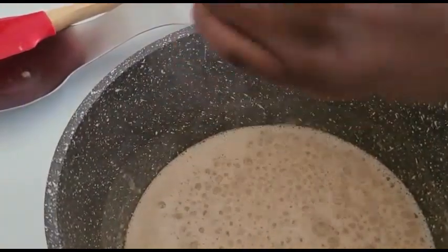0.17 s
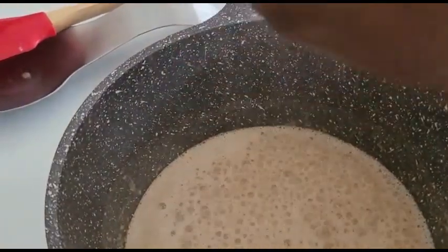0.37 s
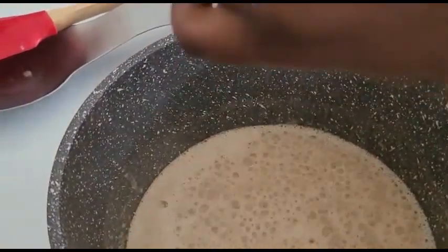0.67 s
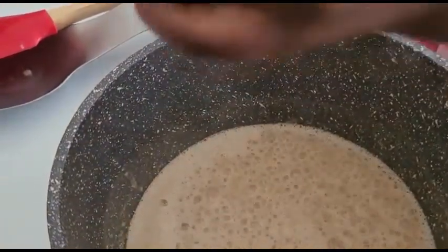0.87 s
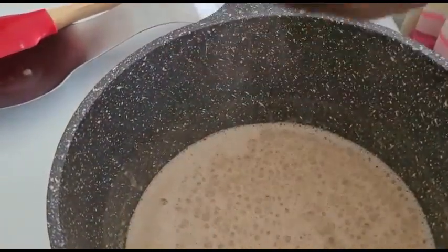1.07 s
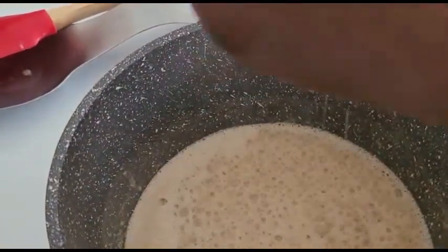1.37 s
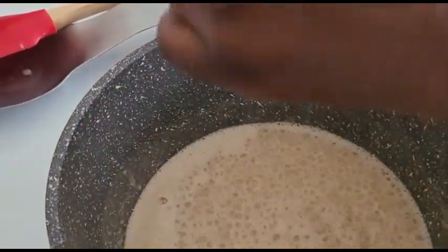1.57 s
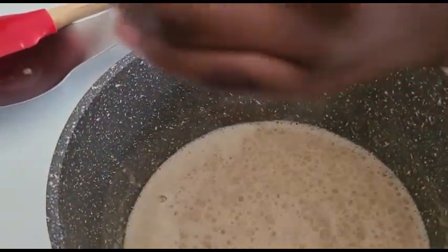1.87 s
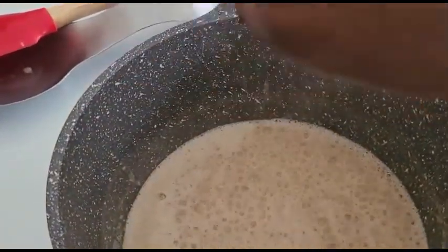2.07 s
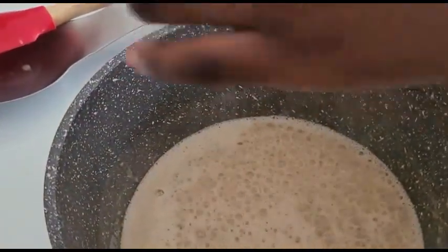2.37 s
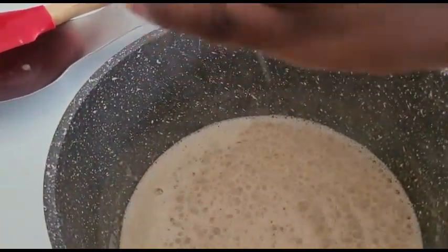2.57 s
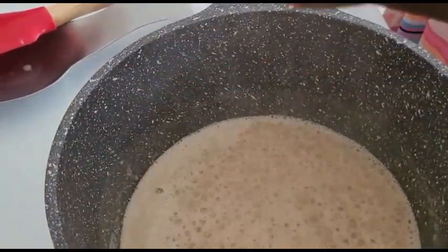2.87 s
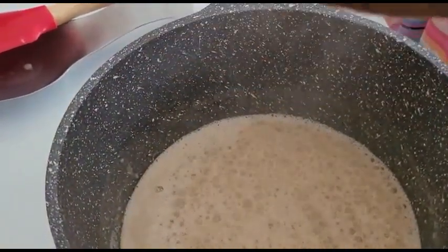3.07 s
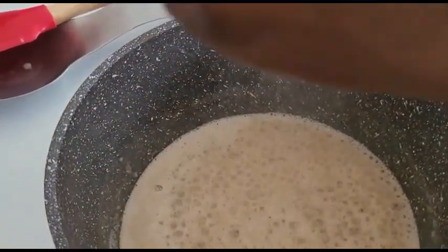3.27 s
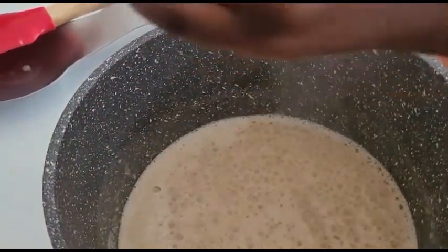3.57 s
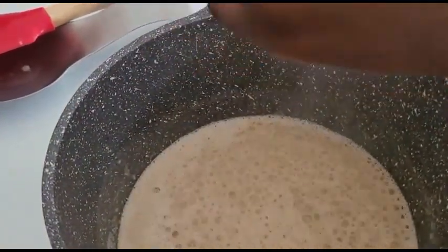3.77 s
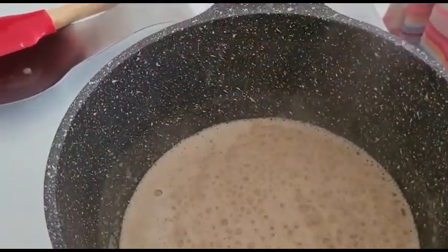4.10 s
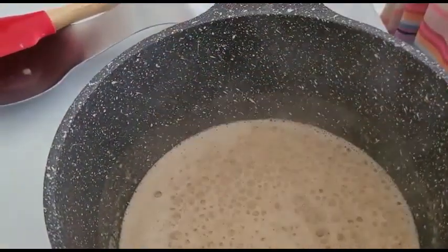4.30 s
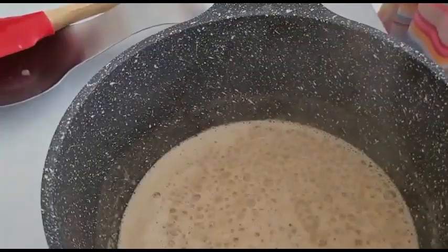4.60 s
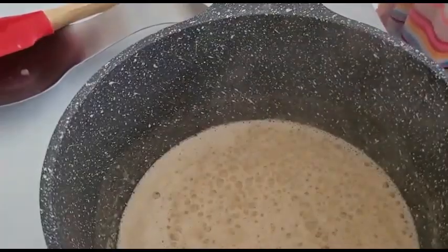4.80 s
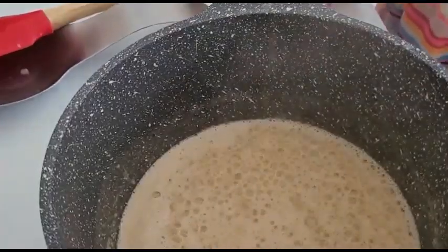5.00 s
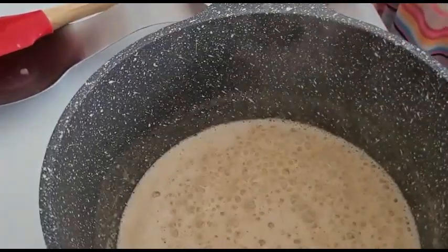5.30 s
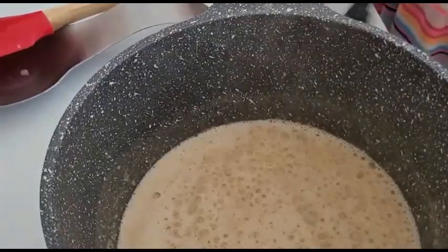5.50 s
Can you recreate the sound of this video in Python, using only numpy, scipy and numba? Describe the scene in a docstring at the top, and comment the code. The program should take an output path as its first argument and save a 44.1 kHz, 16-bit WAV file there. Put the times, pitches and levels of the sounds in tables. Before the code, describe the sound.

Dry hands clap and rub powder off each other close up, over a faint simmering fizz, ending in a hard knock on a worktop.

```python
"""Hands slap and rub powder off each other, close to a phone, over a simmering pan; late knocks follow.
Pats are noise bursts through the resonance of the cupped palms; rubs are gritty noise swelling by stroke.
Something set down and knocked rings the worktop's modes, and a grain pings the pan wall once.
Beneath, the fine fizz of the sauce flickers in octave bands over a gas burner roaring in its tube modes.
A short echo of the small kitchen follows the near sounds."""
import sys
import numpy as np
from scipy import signal
from scipy.fft import rfft, irfft
from scipy.io import wavfile
from scipy.ndimage import uniform_filter1d
from numba import njit

SR = 44100
rng = np.random.default_rng(int(sys.argv[2]) if len(sys.argv) > 2 else 0)


def generate_wav(sig):
    """Save sig (samples, or channels by samples) to the path in sys.argv[1] as 16-bit PCM at SR."""
    pcm = np.round(np.clip(np.atleast_2d(sig).T, -1, 1) * 32767).astype(np.int16)
    wavfile.write(sys.argv[1], SR, pcm)


N = 248935
TIME = np.arange(N) / SR
HZ = np.maximum(np.fft.rfftfreq(N, 1 / SR), 1)

# colour of the air cupped between the palms: (frequency [Hz], relative density [dB per Hz])
CUP_COLOUR = [(410, -70), (700, -26.5), (926, -17.5), (1850, -1.5), (2020, -0.5), (2620, -10), (2910, -3.5),
              (3240, -4.5), (7000, -5.5), (9100, -33), (15400, -120)]
# colour of dry skin hiss: (frequency [Hz], relative density [dB per Hz])
SKIN_COLOUR = [(2940, -42.5), (5000, -12.5), (7270, -9), (8970, -2.5), (9880, -4.5), (12400, -3),
               (13800, -5.5), (16000, -14.5)]
# stereo image of the hands: (frequency [Hz], left-right likeness [correlation])
HANDS_ALIKE = [(300, 1), (2000, 0.49), (6000, 0.032), (14000, 0.13)]


def undb(db):
    """Gain of a dB value."""
    return 10 ** (np.asarray(db) / 20)


def level(x, db):
    """Set the rms in dB, over both channels together."""
    return x * undb(db) / np.sqrt(np.mean(x ** 2))


def over_hz(table):
    """A (Hz, value) table read at every frequency, on a log frequency axis."""
    f, v = np.transpose(table)
    return np.interp(np.log(HZ), np.log(f), v)


def shape(x, gain):
    """Filter by a gain for each frequency."""
    return irfft(rfft(x, axis=-1) * gain, N, axis=-1)


def bump(hz, width_hz, grid=HZ):
    """Causal resonance read on a frequency grid, gain 1 at the centre."""
    damping = 1j * grid * width_hz
    return damping / (hz ** 2 - grid ** 2 + damping)


def pair(alike):
    """Stereo white noise as alike left and right as the table says."""
    c = np.clip(over_hz(alike), -.99, .99)
    mid_side = rfft(rng.standard_normal((2, N)), axis=-1)
    mid, side = mid_side * np.sqrt([(1 + c) / 2, (1 - c) / 2])
    return irfft(np.array([mid + side, mid - side]), N, axis=-1)


def walk(rate):
    """Random levels held 1 / rate s and slewed twice; spread near 1."""
    k = int(SR / rate)
    steps = np.repeat(rng.standard_normal(N // k + 1), k)
    return 1.3 * uniform_filter1d(uniform_filter1d(steps, k), k)[:N]


def burst(s, t60, rise_s=0.0003):
    """Quick rise at s, then an exponential fall."""
    t = np.maximum(TIME - s, 0)
    return (1 - np.exp(-t / rise_s)) * np.exp(-np.log(1000) * t / t60)


def pats():
    """Each pat: a crack that rings the air cupped between the palms, a bright snap, a grainy tail, a soft thump."""
    # pats of the palms: (time [s], strength [dB], cup resonance [Hz], treble before a common lift [dB],
    # left minus right [dB], tail against crack [dB])
    palm_pats = [(0.2214, -34, 3750, -8, -0.5, -13), (0.355, -31, 2950, -19, -3, -16),
                 (0.3767, -4.5, 2630, -15, 0.5, 1.5), (0.3856, 0, 3300, -13.5, -1, -10),
                 (0.4898, -27.5, 2090, -4.5, 2, -10.5), (0.6493, -34, 2000, -1, -2.5, -28),
                 (0.6987, -27, 3250, -21, -3, -11), (0.865, -23, 3300, -17, 1, -8.5),
                 (0.8731, -20.5, 4120, -17.5, -3, -3), (0.9504, -33, 1920, -7, 0.3, -10),
                 (0.985, -35, 2090, -5, 0.5, -11), (1.0184, -38, 2120, -5, 5, -18),
                 (1.0255, -38, 2150, 3, 3, -18), (1.039, -37, 2060, 3, 7, -17),
                 (1.2374, -28, 3310, -20.5, -7, -13), (1.268, -9, 3060, -29, 0, -11),
                 (1.2872, -4.5, 4030, -12.5, -1, -10.5), (1.3744, -16.5, 2860, -12.5, -3, -11.5),
                 (1.3814, -21, 2950, -18, 2, -15), (1.6273, -25, 1720, -16.5, -4, -11),
                 (1.6327, -31.5, 1600, -15, -4, -5), (1.699, -21.5, 3280, -20, -1, -10),
                 (1.733, -28, 3940, -12, -1, -15), (1.74, -18.5, 3980, -23, -4, -13.5),
                 (2.033, -25.5, 6100, -13, -7, -13), (2.085, -13, 3400, -26, -6, -18),
                 (2.095, -7, 3240, -18.5, 1.5, -8.5), (2.639, -30.5, 2140, 2, -1, -8.5),
                 (2.7608, -25, 3500, -24, -2, -7), (2.7935, -22, 2900, -35, -1, -7),
                 (3.1612, -23.5, 3300, -3, 0, -5.5), (3.1744, -10, 3020, -22, -4, -3.5),
                 (3.2, -11.5, 2980, -25, -2, -7), (3.2187, -15.5, 2900, -31, -1, -5.5),
                 (3.2607, -13.5, 3070, -13, -2, -14), (3.4936, -21.5, 2980, -22, -2, -3),
                 (3.5059, -24, 3110, -18, 2, -7), (3.5178, -25, 3360, -19, 8, -3),
                 (3.5251, -7, 3200, -17, -1, -6), (3.8125, -13, 3020, -23, 0, -9),
                 (3.8391, -6.5, 2920, -19.5, 0, -13.5), (4.577, -27, 1910, 5.5, -1, -4),
                 (4.5956, -30, 2280, -7, 6, -18), (4.778, -16.5, 2970, -15, -2, -5.5),
                 (4.7896, -23, 2930, -19, -8, -13), (4.8314, -25, 3120, -23, -4, -16),
                 (4.953, -21.5, 2350, -6, -4, -3)]
    tail_t60_s = 0.067
    thump_db, thump_per_db = -41, 0.8  # thump of a 0 dB pat, and how it follows the pat's strength
    out, span = np.zeros((2, N)), 16384  # span of one pat [samples]
    hz = np.maximum(np.fft.rfftfreq(span, 1 / SR), 1)
    broad = level(shape(pair(HANDS_ALIKE), undb(over_hz(CUP_COLOUR))), 0)
    snap = level(shape(pair(HANDS_ALIKE), undb(over_hz(SKIN_COLOUR))), 0)
    flesh = level(shape(pair(HANDS_ALIKE), bump(450.0, 520.0)), 0)
    air = pair(HANDS_ALIKE)
    grains = undb(3.5 * walk(300))
    bright = bump(9500, 9000, hz)
    for s, db, cup_hz, treble_db, pan_db, tail_db in palm_pats:
        i = slice(int(s * SR), int(s * SR) + span)
        crack = burst(s, 0.012, rise_s=0.00028)
        tail = undb(tail_db) * grains * burst(s, tail_t60_s, rise_s=0.0038)
        hit = (crack + tail)[i]
        hollow = bump(cup_hz, 1300, hz) ** 2
        cup = irfft(rfft(air[:, i] * hit, axis=-1) * hollow, span, axis=-1)
        top = irfft(rfft(snap[:, i] * hit, axis=-1) * bright, span, axis=-1)
        sound = cup + undb(-13.0) * broad[:, i] * hit + undb(treble_db + 4.0) * top
        out[:, i] += sound * undb(db + np.array([[pan_db], [-pan_db]]) / 2)
        thump = flesh[:, i] * burst(s, 0.049, rise_s=0.00027)[i]
        out[:, i] += undb(thump_db + thump_per_db * db) * thump
    return out


def rub():
    """Stick-slip of skin over powder: gritty noise, hollow between the palms and hissy on top."""
    # strokes of one palm over the other: (time at full pressure [s], hold [s], 20 dB rise [s], 20 dB fall [s],
    # cupped mid sound before a common trim [dB], dry skin hiss [dB], cup resonance [Hz]);
    # rises and falls under 5 ms, or negative, act as 5 ms
    strokes = [(.22, 0.0041, 0.1, 0.14, -46.5, -47.5, 3280), (0.395, 0.0041, 0.07, 0.12, -38, -35, 3050),
               (0.684, 0.015, 0.1, 0.4, -50, -49, 2830), (0.865, .005, 0.05, .15, -47, -48, 3800),
               (0.94, .005, .1, 0, -61, -46.5, 3500), (1.053, 0.0056, .1, -0.3, -64, -44, 2400),
               (1.228, .01, 0.13, 0.23, -47, -51, 3070), (1.271, 0.0097, 0.0355, 0.13, -33.5, -39, 3200),
               (1.392, 0.0055, 0.07, -0.06, -46.5, -38, 2900), (1.647, 0.088, 0.2, 0, -52, -52, 2800),
               (1.736, .005, -0.2, 0.1, -47, -46, 3760), (1.903, .005, 0, 0.04, -54, -47.5, 2640),
               (2.04, 0.054, -0.13, 0.02, -44, -48, 3150), (2.102, 0.086, -0.02, 0.03, -39.5, -37.5, 2560),
               (2.393, .005, 1, 0.2, -64, -50.5, 2300), (2.631, .005, 0, 0.22, -47.5, -40, 3440),
               (2.787, .005, -0.08, 0.03, -43, -48, 2950), (3.171, 0.035, 0.104, 0.12, -34, -35.5, 3080),
               (3.513, 0.0045, 0.05, .09, -39, -38.5, 3240), (3.82, 0.035, .04, 0.04, -39, -41.5, 2830),
               (4.276, 0.029, -0.01, 0.2, -49, -35.5, 3100), (4.303, 0.041, 0.03, 0.18, -49, -32, 3230),
               (4.464, 0.055, 0.02, 0.02, -52, -29, 3520), (4.53, 0.075, 0.0851, 0.05, -39, -21, 2200),
               (4.8, 0.2, 0.26, .05, -46.5, -44.5, 3050), (4.956, 0.0037, .015, 0.18, -38, -31.5, 2950),
               (5.027, 0.0046, 1.2, 0.5, -54.5, -64, 3600)]
    rest_cup_db, rest_skin_db, rest_hz = -61, -56, 2320  # palms in light contact between strokes
    smooth_db = -34  # around this hiss level the palms start to glide and the grit evens out
    cup_power, skin_power = undb(2 * rest_cup_db), undb(2 * rest_skin_db)
    cup_hz = cup_power * rest_hz  # weighted by power: the loudest stroke dominates the hollow's pitch
    for s, hold_s, rise_s, fall_s, cup_db, skin_db, stroke_hz in strokes:
        push = pressure(s, hold_s, rise_s, fall_s)
        cup_power = cup_power + undb(2 * cup_db) * push
        skin_power = skin_power + undb(2 * skin_db) * push
        cup_hz = cup_hz + undb(2 * cup_db) * push * stroke_hz
    coarse, fine = crunch(110, 2.0, .012), crunch(400, 1.6, .004)
    broad = shape(pair(HANDS_ALIKE) * coarse, undb(over_hz(CUP_COLOUR)))
    hollow = np.array([svf(c, cup_hz / cup_power, 1400.0) for c in broad])
    cup = level(hollow, 0) + level(broad, 0)
    grit = (fine * np.sqrt(coarse)) ** (1 / (1 + skin_power / undb(2 * smooth_db)))
    skin = level(shape(pair(HANDS_ALIKE) * grit, undb(over_hz(SKIN_COLOUR))), 0)
    return cup * np.sqrt(cup_power) * undb(-4.5) + skin * np.sqrt(skin_power)


def pressure(s, hold_s, rise_s, fall_s):
    """Power envelope of a stroke: steady rise in dB, hold, steady fall."""
    early = np.maximum(s - TIME, 0) / max(rise_s, .005)
    late = np.maximum(TIME - s - hold_s, 0) / max(fall_s, .005)
    return undb(-2 * 20 * np.minimum(early + late, 10))


def crunch(rate, spread_db, t60):
    """Envelope of powder grains catching and letting go at random moments, over a steady base."""
    catches = (rng.random(N) < rate / SR) * undb(spread_db * rng.exponential(size=N))
    return 1 + signal.lfilter([1], [1, -np.exp(-np.log(1000) / (t60 * SR))], catches)


@njit
def svf(x, hz, width):
    """State-variable band-pass whose centre may move."""
    y, b, l = np.empty(len(x)), 0., 0.  # output, band state, low state
    for i in range(len(x)):
        g, k = np.tan(np.pi * hz[i] / SR), width / hz[i]
        v = (b + g * (x[i] - l)) / (1 + g * (g + k))
        b, l, y[i] = 2 * v - b, l + 2 * g * v, k * v
    return y


def knocks():
    """A blow and a loose rattle ring the worktop; a softer contact favours its lower modes."""
    # knocks on the worktop: (time [s], strength [dB], brightness [Hz], rattle t60 [s], rattle against blow [dB]);
    # a rattle lasts at least 20 ms
    blows = [(5.177, -39, 590, 0.19, -2), (5.233, -53, 447, 0.049, 1), (5.5192, -17.5, 2050, 0.24, -4),
             (5.554, -39, 2380, 0.048, -11), (5.571, -36.5, 1470, 0.6, -2.5),
             (5.61, -28.5, 5500, 0.19, -4.5), (5.619, -33.5, 5040, 0.39, -2.5)]
    # modes of the worktop: (frequency [Hz], relative level [dB], t60 [s])
    worktop_modes = [(353, -3.5, 0.067), (454, 0.5, 0.04), (593, -4.5, 0.016), (766, -5.5, 0.019),
                     (1046, -7.5, 0.021), (1350, -10.5, 0.012), (1730, -8, 0.0058), (2100, -6.5, 0.023),
                     (2566, -5.5, 0.0074), (2930, -11, 0.045), (3710, -18, 0.033), (4190, -12, 0.01),
                     (5250, -10, 0.0099), (6130, -11.5, 0.013)]
    # a wide board off to the side: (frequency [Hz], left-right likeness [correlation])
    board_alike = [(200, 0.99), (600, 0.41), (3000, 0.026), (7000, 0.081)]
    # the cupboard under the worktop booms a little, less for harder contacts
    thud_hz, thud_width_hz, thud_t60_s = 80, 180, 0.35
    thud_db, thud_db_per_octave = -16.5, -14.5  # level at 600 Hz brightness, change per octave above
    out = np.zeros((2, N))
    rattle = pair(board_alike) * undb(1.7 * walk(250))
    thin = signal.butter(2, 220, "high", fs=SR, output="sos")  # the board radiates little bass
    boom = level(shape(rng.standard_normal(N), bump(thud_hz, thud_width_hz) ** 2), 0)
    for s, db, bright_hz, rattle_t60, rattle_db in blows:
        i = slice(int(s * SR), N)
        blow = burst(s, 0.047, rise_s=3.3 / bright_hz)
        loose = undb(rattle_db) * burst(s, max(rattle_t60, .02), rise_s=0.0041)
        force = rattle[:, i] * (blow + loose)[i]
        body = 0
        for f, mode_db, t60 in worktop_modes:
            # modes weaken with distance from the brightness, both up and down
            reach_db = -4.0 * np.log2(f / bright_hz) ** 2
            body = body + undb(mode_db + reach_db) * ring(force, f, t60)
        dull = signal.butter(2, min(2.5 * bright_hz, 15000), fs=SR, output="sos")
        out[:, i] += undb(db) * signal.sosfilt(np.vstack([thin, dull]), body)
        boom_db = db + thud_db + thud_db_per_octave * np.log2(bright_hz / 600)
        out += undb(boom_db) * boom * burst(s, thud_t60_s, rise_s=0.0066)
    return out


def ring(x, hz, t60):
    """One mode set ringing by x, equal power whatever its decay."""
    r = np.exp(-np.log(1000) / (t60 * SR))
    gain = np.sqrt(1 - r * r)
    return signal.lfilter([gain, 0, -gain], [1, -2 * r * np.cos(2 * np.pi * hz / SR), r * r], x)


def ticks():
    """A hard grain pings a high mode of the pan wall, which buzzes as the grain skips on."""
    # pings: (time [s], level [dB])
    pings = [(0.6495, -30)]
    buzz = undb(4.0 * walk(245))
    tone = np.sin(2 * np.pi * 11150 * TIME)
    out = 0
    for s, db in pings:
        envelope = burst(s, 0.014) + 0.23 * buzz * burst(s, 0.15)
        out = out + undb(db) * envelope * tone
    return out


def simmer():
    """Fizz of tiny bubbles in octave bands that flicker alone, most in the bass, over the burner's roar."""
    # colour of the fizz: (frequency [Hz], relative density [dB per Hz])
    fizz_colour = [(15, -48), (25, -16.5), (70, -16), (123, -23.5), (229, -14.5), (277, -15), (695, -3.5),
                   (887, -9), (2050, -8), (2480, -10.5), (4740, -10.5), (7310, -17.5), (11300, -8),
                   (13600, -13.5), (16000, -16.5)]
    # tube modes of the burner: (frequency [Hz], width [Hz], level before flicker [dB])
    burner_modes = [(680.7, 38, -63), (1381, 340, -59), (2148, 270, -57)]
    # stereo image of the far sound: (frequency [Hz], left-right likeness [correlation])
    far_alike = [(60, 0.32), (300, 0.67), (700, 0.81), (1400, 0.25), (3000, 0.24), (7000, 0.)]
    grain = undb(0.95 * walk(900))  # bursts make the hiss slightly gritty
    fizz = rfft(pair(far_alike) * grain, axis=-1) * undb(over_hz(fizz_colour))
    swell = walk(0.82)  # shared by all bands
    out = 0
    for centre in 30 * 2. ** np.arange(10):
        band = np.cos(np.pi / 2 * np.clip(np.log2(HZ / centre), -1, 1)) ** 2
        flicker_db = 0.95 + 2.2 / (1 + centre / 300.0)
        out = out + irfft(fizz * band, N, axis=-1) * undb(0.23 * swell + flicker_db * walk(7))
    roar = 0
    for f, width_hz, db in burner_modes:
        mode = level(shape(pair(far_alike), bump(f, width_hz) ** 2), db)
        roar = roar + mode * undb(0.32 * walk(12))
    return level(out, -47.5) + roar


def scene():
    """Hands, knocks and ticks with the kitchen's short echo, over the simmer."""
    room_t60_s, room_db = 0.33, -10
    near = pats() + rub() + knocks() + ticks()
    decay = burst(0.0112, room_t60_s, rise_s=0.00054)[:SR // 2]
    echo = rng.standard_normal((2, SR // 2)) * decay
    echo = echo / np.sqrt(np.sum(echo ** 2) / 2)  # unit energy per channel on average
    walls = signal.fftconvolve(near, echo, axes=1)[:, :N]
    return near + undb(room_db) * walls + simmer()


def record(dry):
    """The phone rounds the loudest peaks by soft saturation and cuts the top by a steep low-pass."""
    top_hz = 15750
    soft = .85 * np.tanh(dry / .85)
    return signal.sosfilt(signal.ellip(10, .2, 80, top_hz, fs=SR, output="sos"), soft)


dry = scene()
out = record(dry)
generate_wav(out)
```